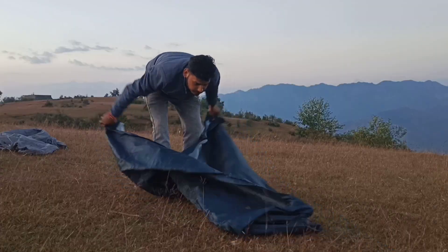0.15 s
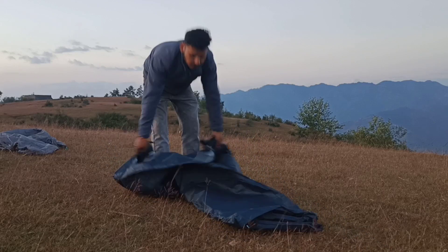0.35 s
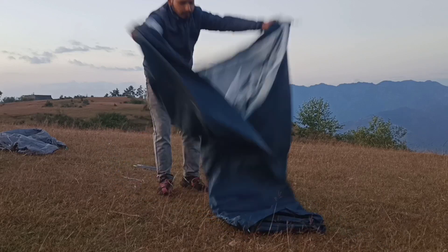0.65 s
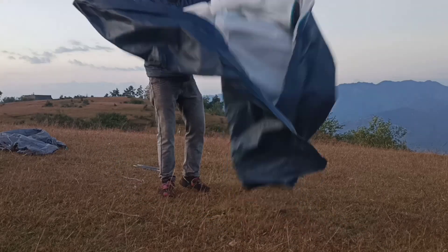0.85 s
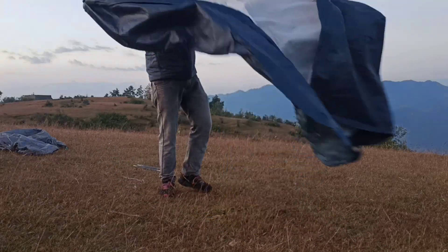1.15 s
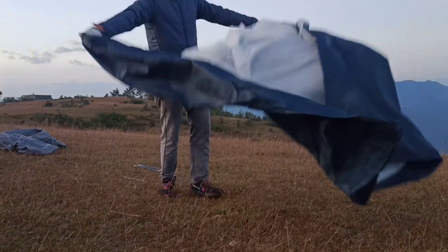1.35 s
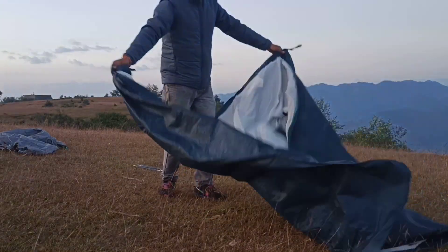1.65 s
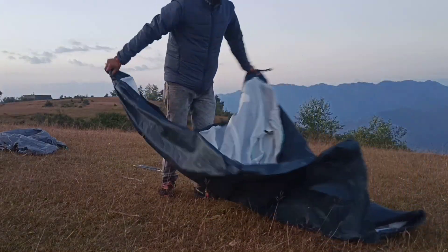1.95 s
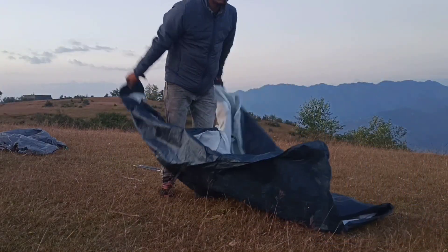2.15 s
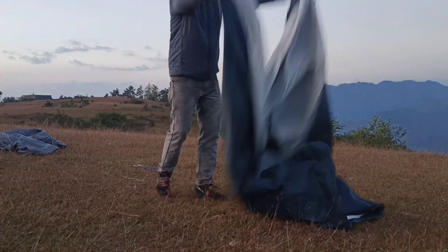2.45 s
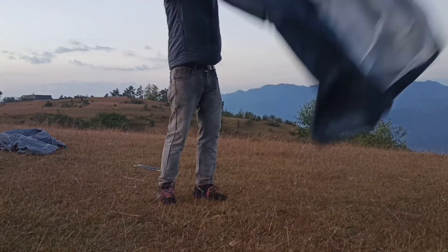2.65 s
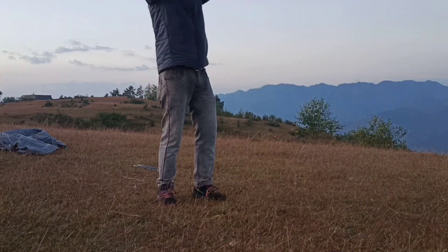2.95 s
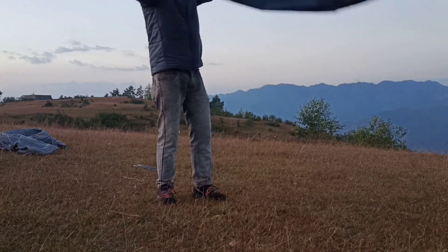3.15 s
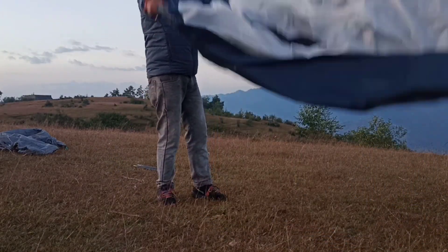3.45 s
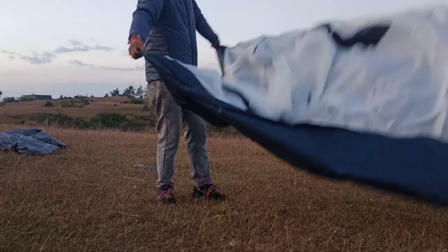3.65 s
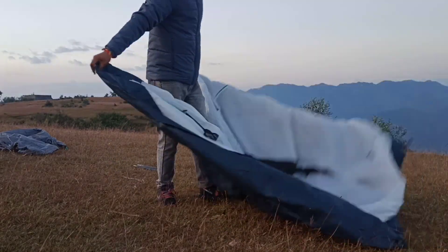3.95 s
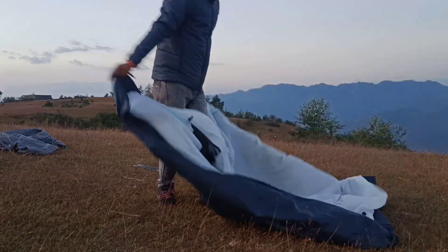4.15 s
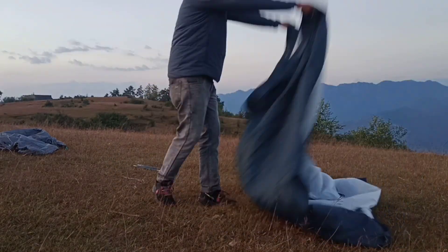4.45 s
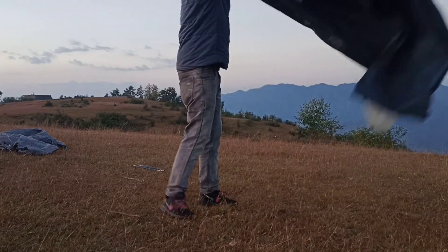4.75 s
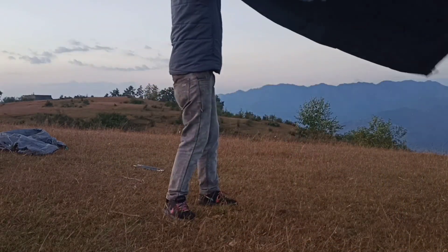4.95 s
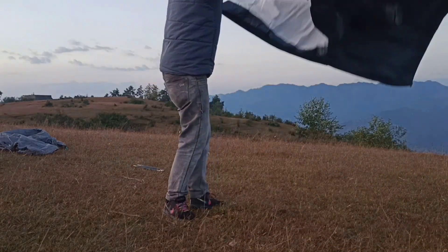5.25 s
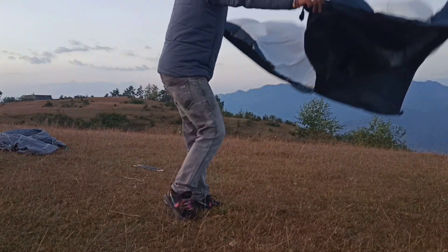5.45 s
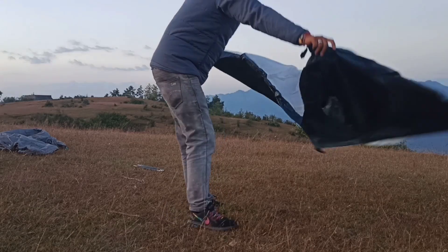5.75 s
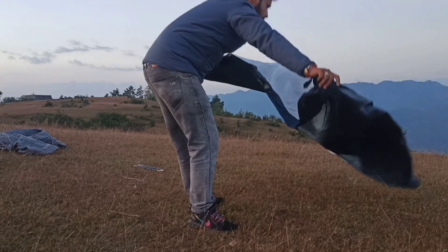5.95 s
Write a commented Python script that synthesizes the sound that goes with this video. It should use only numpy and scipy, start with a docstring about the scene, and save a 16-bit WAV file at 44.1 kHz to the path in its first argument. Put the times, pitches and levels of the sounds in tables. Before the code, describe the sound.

A thin nylon tent sheet is shaken outdoors on a grassy hilltop. Three hard upward swings each bring a whipping rush and low whoof, the second the sharpest, with a heavy slap of air. Between them the cloth flutters, crinkles, nearly hushes while hanging, then falls and slides over itself and grass. Small zip or clip ticks appear. Close, dry mono pickup, very faint wind.

```python
"""An open, windy, grassy hilltop: a nylon tent is shaken out three times.
Each swing pulls the sheet taut with a crack; it rises, flutters and crinkles, then sinks and slides over
itself and the grass. Cloth is filtered noise bursts and small rings; shoved air is low noise and damped swings.
One ground echo lags more as the cloth goes up, so a hollow colour sweeps through the rustle."""
import sys
import numpy as np
from scipy import signal
from scipy.fft import rfft, irfft, next_fast_len
from scipy.io import wavfile
from scipy.ndimage import uniform_filter1d

SR = 44100
rng = np.random.default_rng(int(sys.argv[2]) if len(sys.argv) > 2 else 0)


def file_out(sig):
    """Save sig as 16-bit WAV at sys.argv[1]."""
    # one column per channel
    cols = np.atleast_2d(sig).T
    # limit, then scale
    lim = np.clip(cols, -1, 1)
    pcm = np.round(lim * 32767).astype(np.int16)
    wavfile.write(sys.argv[1], SR, pcm)


N = 268569
TIME = np.arange(N) / SR


def from_db(db):
    """Decibels to gain."""
    return 10 ** (np.asarray(db) / 20)


def rms_one(x):
    """Scale to unit rms."""
    return x / np.sqrt(np.mean(x ** 2) + 1e-20)


def in_time(rows):
    """The columns of a curve, interpolated at every sample."""
    s, *columns = np.transpose(rows)
    return [np.interp(TIME, s, column) for column in columns]


def coloured(x, colour):
    """Causal (minimum-phase) filter with the given spectrum; keeps the power of white noise."""
    size = next_fast_len(N + SR // 4, True) * 2
    hz, db = np.transpose(colour)
    bin_hz = np.arange(size // 2 + 1) * SR / size
    bin_db = np.interp(np.log(bin_hz + 1), np.log(hz), db, left=db[0] - 6, right=db[-1] - 30)
    cepstrum = irfft(np.log(rms_one(from_db(bin_db))))
    # fold the cepstrum onto positive time: minimum phase
    cepstrum[1:size // 2] *= 2
    cepstrum[size // 2 + 1:] = 0
    response = np.exp(rfft(cepstrum))
    return irfft(rfft(x, size) * response)[:N]


def dying(kicks, fade_s):
    """Each kick dies away exponentially."""
    return signal.lfilter([1], [1, -np.exp(-1 / (fade_s * SR))], kicks + 1e-18)


def buckles(per_s, spread_db, fade_s, smooth_share):
    """Creases buckle at random, each a tiny burst of its own size, over smooth friction; rms near 1."""
    sizes = from_db(spread_db * np.minimum(rng.exponential(1, N), 4))
    hits = rng.random(N) < per_s / SR
    power = dying(hits * sizes ** 2, fade_s / 2)
    nearby = uniform_filter1d(uniform_filter1d(power, size=1800), size=1800)
    evened = power / (np.abs(nearby) + 1e-9)
    return rng.standard_normal(N) * np.sqrt(smooth_share + (1 - smooth_share) * evened)


def crackle(per_s, spread_db, cycles, low_hz, high_hz):
    """Wrinkles or pockets flip at random; each rings for a few cycles at one of 14 pitches."""
    pitches_hz = np.geomspace(low_hz, high_hz, 14)
    sizes = from_db(spread_db * np.minimum(rng.exponential(1, N), 3.5)) * rng.choice([-1, 1], N)
    clicks = sizes * (rng.random(N) < per_s / SR)
    dealt = rng.integers(0, len(pitches_hz), N)
    out = np.zeros(N)
    for k, hz in enumerate(pitches_hz):
        r, w = np.exp(-hz / (cycles * SR)), 2 * np.pi * hz / SR
        resonance = [1, -2 * r * np.cos(w), r * r]
        out += signal.lfilter([1, 0, -1], resonance, clicks * (dealt == k) + 1e-18) * np.sqrt(w)
    return rms_one(out)


def pops(rows, fade_s, edge_db):
    """At each (time, level) a sharp click, then a short burst as the material around it settles."""
    kicks = np.zeros(N)
    for s, db in rows:
        kicks[int(s * SR)] = from_db(db)
    return from_db(edge_db) * kicks + dying(kicks, fade_s) * rng.standard_normal(N)


SWELL_SHARE = 0.49   # part of the length that sets the rise; the rest sets the fade


def swells(rows):
    """At each (time, level, length) a gain that swells exponentially to a crest and fades."""
    gain = np.zeros(N)
    for s, db, length_s in rows:
        age = np.maximum((s - TIME) / SWELL_SHARE, (TIME - s) / (1 - SWELL_SHARE))
        gain += from_db(db) * np.exp(-age / length_s)
    return gain


# arms throw the sheet upwards: (time of greatest speed [s], flutter level [dB], crinkle level [dB])
SWINGS = [(0.598, -31, -30), (2.488, -29, -29.5), (4.482, -30.5, -28.5)]
# sheet sways in the wind, nearly still hanging at the top: (time [s], flutter level [dB], crinkle level [dB])
SWAY = [(0.0, -41, -42), (0.27, -46.5, -43.5), (0.44, -39, -32.5), (0.9, -34.5, -35), (1.14, -62, -64.5),
        (1.27, -59, -60.5), (1.33, -48, -42.5), (1.72, -39, -39), (2.18, -40.5, -41.5), (2.8, -39, -36),
        (3.21, -40, -39), (3.41, -46, -47.5), (3.74, -40.5, -42.5), (4.22, -41.5, -44),
        (5.08, -42.5, -39.5), (5.5, -50.5, -54.5), (5.64, -62, -64.5), (5.93, -50.5, -48),
        (6.09, -56.5, -51.5)]
# sheet goes slack for an instant: (time [s], dip [dB], half-length [s])
SLACKS = [(1.416, -0.5, 0.03), (1.953, -7, 0.035), (2.16, -4, 0.064), (2.896, -5, 0.023),
          (3.283, -4, 0.035), (3.4, -5, 0.02), (4.053, -4, 0.027), (4.184, -2.5, 0.023),
          (5.104, -6, 0.0096), (5.824, -1, 0.029)]
PULL_S, COAST_S, COAST_POWER = 0.092, 0.51, 1.167


def motion():
    """Flutter and crinkle levels (dB): sway plus exponential pulls that coast to rest, with slack dips."""
    power = from_db(in_time(SWAY)) ** 2
    for s, *levels_db in SWINGS:
        age_s = TIME - s
        pull = np.exp(np.minimum(age_s, 0) / PULL_S)
        coast = np.clip(1 - age_s / COAST_S, 0, 1) ** COAST_POWER
        power = power + (from_db(levels_db)[:, None] * pull * coast) ** 2
    dips_db = sum(db * np.exp(-((TIME - s) / half_s) ** 2) for s, db, half_s in SLACKS)
    return 10 * np.log10(power) + dips_db


# spectrum of broad folds: (frequency [Hz], level per Hz [dB])
FLUTTER_COLOUR = [(90, -29.5), (130, -5.5), (180, -1.5), (400, -0.5), (650, -2.5), (900, -6.5), (1500, -14),
                  (3000, -76)]
# spectrum of small creases: (frequency [Hz], level per Hz [dB])
CRINKLE_COLOUR = [(350, -31), (700, 3), (1000, -2), (1600, 5), (2200, 0.5), (3300, -0.5), (5000, -1.5),
                  (6600, -4), (8000, -15.5), (10500, -24.5), (13500, -19), (16000, -16)]
POCKETS_PER_S, POCKET_DB, POCKET_CYCLES = 18, -9, 3.4   # small random pockets; dB against the flutter


def rustle(flutter_db, crinkle_db):
    """Broad folds flutter low, small creases crinkle high; harder shaking buckles more of them."""
    busy = from_db(0.8 * (crinkle_db - np.median(crinkle_db)))
    folds = buckles(per_s=240 * busy, spread_db=2.0, fade_s=0.0018, smooth_share=0.65)
    small_creases = buckles(per_s=420 * busy, spread_db=3.4, fade_s=0.0013, smooth_share=0.24)
    wrinkles = from_db(-3) * crackle(per_s=1200, spread_db=2.5, cycles=2.4, low_hz=728, high_hz=6640)
    pockets = from_db(POCKET_DB) * crackle(
        per_s=POCKETS_PER_S, spread_db=-3.0, cycles=POCKET_CYCLES, low_hz=166.6, high_hz=1170)
    flutter = from_db(flutter_db - 0.5) * (coloured(folds, FLUTTER_COLOUR) + pockets)
    crinkle = from_db(crinkle_db - 4.53) * (coloured(small_creases, CRINKLE_COLOUR) + wrinkles)
    return flutter + crinkle


# folds whipping taut: (crest time [s], level [dB], length [s])
FLAPS = [(0.597, -18, 0.035), (0.64, -24, 0.033), (1.36, -33, 0.019), (1.652, -28, 0.056),
         (1.883, -40, 0.024), (2.357, -32.5, 0.0095), (2.407, -21.5, 0.047), (2.481, -15, 0.036),
         (2.54, -19.5, 0.041), (2.622, -23.5, 0.069), (3.336, -35, 0.028), (4.36, -32, 0.033),
         (4.456, -26.5, 0.088), (4.574, -24.5, 0.025), (5.48, -47.5, 0.05), (5.875, -41, 0.016)]
# spectrum of the rush: (frequency [Hz], level per Hz [dB])
FLAP_COLOUR = [(60, -9.5), (180, 5.5), (450, 8), (800, -0.5), (1500, 2), (2200, -0.5), (3600, 0.5),
               (6500, -3.5), (8200, -13), (10500, -19.5), (13500, -15.5), (16000, -26)]
FLAP_BODY_DB = -6.5   # low flutter against the rush


def flaps():
    """A whipping fold sets off a rush of buckles over a low flutter of the cloth around it."""
    threads = buckles(per_s=5300, spread_db=4.0, fade_s=0.0007, smooth_share=0.28)
    rush = coloured(threads, FLAP_COLOUR)
    body = from_db(FLAP_BODY_DB) * coloured(rng.standard_normal(N), FLUTTER_COLOUR)
    return swells(FLAPS) * (rush + body)


# loudest creases popping over: (time [s], relative level [dB])
CREASES = [(.315, -21), (.761, -14), (.801, -12), (.95, -17.5), (1.043, -32), (1.185, -38.5), (1.249, -37),
           (1.29, -32), (1.315, -23), (1.424, -21.5), (1.457, -22), (1.494, -21.5), (2.348, -10),
           (3.095, -20), (3.253, -28), (3.318, -24.5), (3.717, -25), (3.79, -17.5), (3.809, -20),
           (4.317, -23), (5.125, -22.5), (5.186, -30), (5.267, -28), (5.303, -29), (5.389, -37),
           (5.416, -30), (5.496, -31), (5.607, -47), (5.72, -40), (5.783, -34.5), (5.86, -29), (5.963, -29),
           (6.028, -31.5)]
CREASE_DB = -12


def creases():
    """A crease snaps over with a click and a short burst, in the crinkle spectrum."""
    return from_db(CREASE_DB) * coloured(pops(CREASES, fade_s=0.0047, edge_db=9), CRINKLE_COLOUR)


# hem drags over the grass: (start [s], length [s], hiss level [dB])
DRAGS = [(-0.003, 0.2, -44), (0.796, 0.025, -39.5), (1.828, 0.099, -44.5), (1.98, 0.38, -48.5),
         (2.406, 0.012, -33), (3.54, 0.1, -53), (3.87, 0.038, -47), (4.02, 0.096, -47.5),
         (4.674, 0.05, -41.5), (5.56, 0.45, -70)]
# spectrum of the hiss: (frequency [Hz], level per Hz [dB])
SLIDE_COLOUR = [(2000, 4), (4500, 8.5), (6500, 12.5), (8200, 2.5), (10500, -3.5), (13800, 6), (16000, -14)]
# how high the cloth flies, also sets the ground echo: (time [s], height [0-1])
HEIGHT = [(0, 0.03), (0.55, 0), (1.0, 0.61), (1.45, 0.45), (1.9, 0.07), (2.45, 0.07), (2.8, 0.78),
          (3.05, 0.82), (3.4, 0.71), (3.8, 0.12), (4.15, 0.0), (4.55, 0.06), (4.9, 0.52), (5.25, 0.59),
          (5.65, 0.3), (6.09, 0.35)]
DRAG_ATTACK_S, DRAG_RELEASE_S = 0.025, 0.068
USUAL_DB = -40   # reference for flutter and crinkle
RUB_DB, RUB_FOLLOWS, RUB_LIFT_DB = -53, 1.16, -9   # hiss at USUAL_DB; dB per dB of crinkle; change at height 1


def sliding(crinkle_db):
    """The weave rubs on itself and the grass: a fine, bright hiss, less so when the sheet is aloft."""
    height, = in_time(HEIGHT)
    rub_db = RUB_DB + RUB_FOLLOWS * (crinkle_db - USUAL_DB) + RUB_LIFT_DB * height
    power = from_db(rub_db) ** 2
    for s, length_s, db in DRAGS:
        rise = np.minimum(TIME - s, 0) / DRAG_ATTACK_S
        fall = np.maximum(TIME - s - length_s, 0) / DRAG_RELEASE_S
        power = power + (from_db(db) * np.exp(rise - fall)) ** 2
    threads = buckles(per_s=1400, spread_db=13.0, fade_s=0.002, smooth_share=0.64)
    return np.sqrt(power) * coloured(threads, SLIDE_COLOUR)


# zip pulls and clips: (time [s], relative level [dB])
TICKS = [(2.820, -30), (2.861, -27), (2.994, -24.5), (4.794, -19.5), (4.824, -17), (4.837, -21.5),
         (4.856, -24.5), (5.501, -39), (5.802, -40), (5.860, -38), (5.873, -32.5), (5.963, -36)]
# spectrum of the ticks: (frequency [Hz], level per Hz [dB])
TICK_COLOUR = [(800, -32), (3000, -4), (5500, 10), (8000, -1.5), (11000, -13), (14000, -4), (16000, -16)]


def ticks():
    """Zip pulls and clips tick: a bright click and a very short burst."""
    return from_db(-6) * coloured(pops(TICKS, fade_s=0.0026, edge_db=14), TICK_COLOUR)


LOW_LAG_S, LAG_PER_HEIGHT_S = 0.00037, 0.001954
LOW_ECHO, ECHO_PER_HEIGHT = 0.21, 0.38   # gain


def over_ground(x, grass_cut_hz):
    """Direct sound plus one ground echo, later and stronger with height; grass soaks up its treble."""
    height, = in_time(HEIGHT)
    lag_s = LOW_LAG_S + LAG_PER_HEIGHT_S * height
    strength = LOW_ECHO + ECHO_PER_HEIGHT * height
    dull = signal.sosfilt(signal.butter(1, grass_cut_hz, fs=SR, output="sos"), x)
    return x + strength * np.interp(TIME - lag_s, TIME, dull)


# whole sheet bellies out with a low whoof: (crest time [s], level [dB], length [s])
WHOOFS = [(0.6, -34, 0.031), (0.77, -36, 0.055), (1.6, -45, 0.35), (2.54, -35.5, 0.079), (3.42, -48, 0.05),
          (3.8, -46, 0.29), (4.23, -37, 0.13), (4.53, -36.5, 0.14), (5.0, -45, 0.14), (5.29, -48, 0.17)]
# big pockets of air slapped out of the cloth: (time [s], level [dB], frequency [Hz], ring [cycles])
THUMPS = [(0.599, -24, 221, 1.2), (0.69, -23, 193, 2.7), (0.95, -24, 590, 2), (1.199, -44, 111, 0.65),
          (2.4815, -8, 357, 0.8), (2.492, -18, 176, 1.6), (2.535, -15, 280, 1.7), (2.632, -22.5, 387, 4.9),
          (3.253, -29, 490, 2.8), (3.506, -32, 85, 0.62), (4.2, -37, 126, 1.9), (3.66, -33, 860, 2.9),
          (3.717, -28, 417, 1.6), (3.724, -42, 1050, 3.3), (3.744, -30.5, 1070, 4.3),
          (3.792, -29, 1090, 4.3), (3.985, -32.5, 208, 3.4), (4.125, -27.5, 340, 1.3),
          (4.359, -40, 229, 1.3), (4.456, -26, 182, 1.4), (4.568, -26, 147, 1.4), (5.389, -37, 910, 2)]
# spectrum of shoved air: (frequency [Hz], level per Hz [dB])
BILLOW_COLOUR = [(22, -38), (40, -15.5), (62, -2), (120, 0), (170, -14), (300, -27.5)]
BILLOW_DB, BILLOW_FOLLOWS = -50.5, 0.77   # push at USUAL_DB; dB per dB of flutter


def air(flutter_db):
    """Flutter and bellying shove air; a collapsing pocket gives a brief, damped swing of pressure."""
    billow = from_db(BILLOW_DB + BILLOW_FOLLOWS * (flutter_db - USUAL_DB))
    push = np.hypot(billow, swells(WHOOFS))
    out = push * coloured(rng.standard_normal(N), BILLOW_COLOUR)
    for s, db, hz, ring_cycles in THUMPS:
        cycles = np.clip((TIME - s) * hz, 0, 60)
        age = 2 * cycles / ring_cycles
        out -= from_db(db) * np.sin(2 * np.pi * cycles) * age * np.exp(1 - age)
    return out


# spectrum of the far wind: (frequency [Hz], level per Hz [dB])
WIND_COLOUR = [(30, 12), (90, 6), (250, -16), (600, -37), (2200, -48), (7000, -2.5), (8500, -35),
               (11000, -40), (13700, -9), (15700, -53)]
WIND_DB = -69


def wind():
    """Far wind: steady coloured noise."""
    return from_db(WIND_DB) * coloured(rng.standard_normal(N), WIND_COLOUR)


def scene():
    """The cloth above the grass, the air it moves and the far wind."""
    flutter_db, crinkle_db = motion()
    cloth = rustle(flutter_db, crinkle_db) + flaps() + creases() + sliding(crinkle_db) + ticks()
    cloth = over_ground(cloth, grass_cut_hz=780)
    return (from_db(1.73) * cloth + air(flutter_db) + wind())[None]


RUMBLE_CUT_HZ, CUTOFF_HZ = 37, 15750


def record(dry):
    """The microphone sheds the deepest rumble; the top is cut steeply."""
    lean = signal.sosfilt(signal.butter(3, RUMBLE_CUT_HZ, "high", fs=SR, output="sos"), dry)
    return signal.sosfilt(signal.ellip(12, 0.1, 90, CUTOFF_HZ, fs=SR, output="sos"), lean)


dry = scene()
out = record(dry)
file_out(out)
```